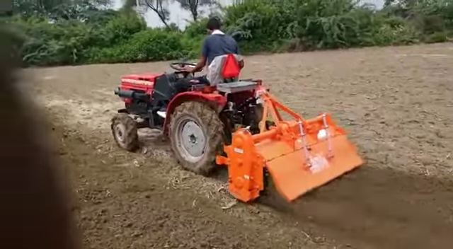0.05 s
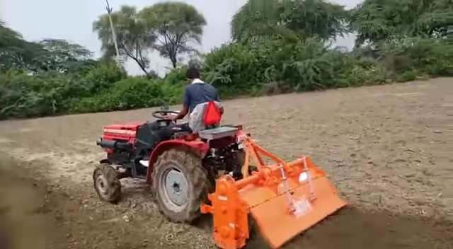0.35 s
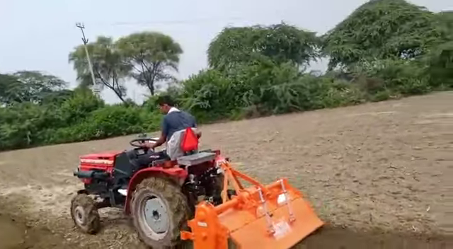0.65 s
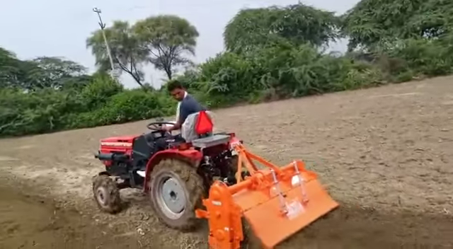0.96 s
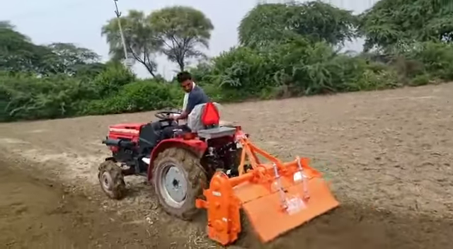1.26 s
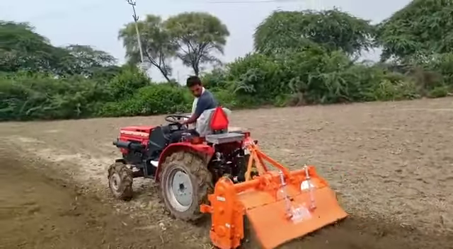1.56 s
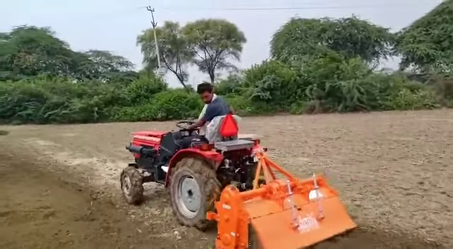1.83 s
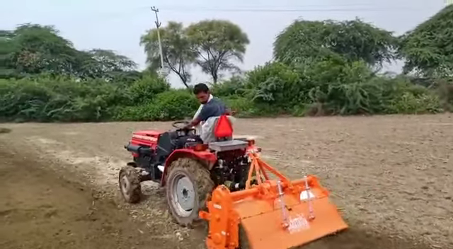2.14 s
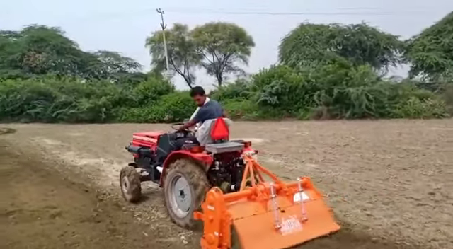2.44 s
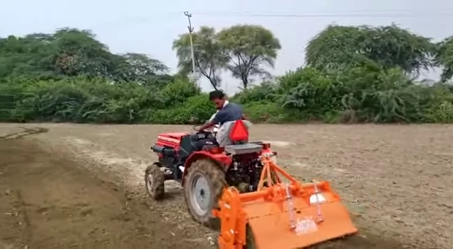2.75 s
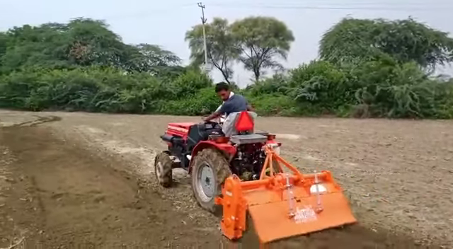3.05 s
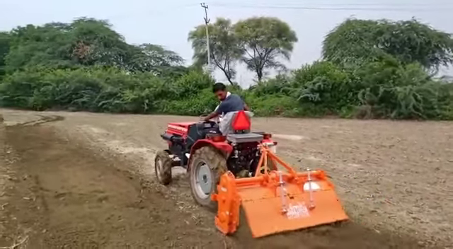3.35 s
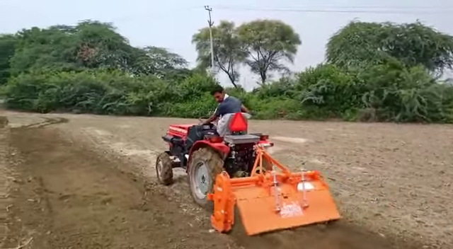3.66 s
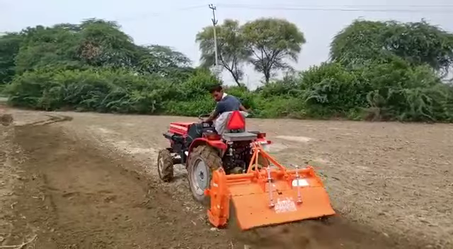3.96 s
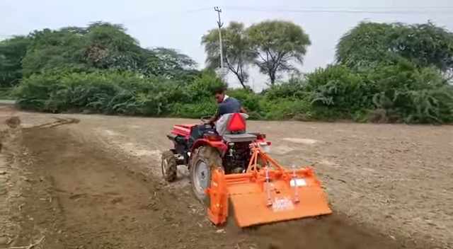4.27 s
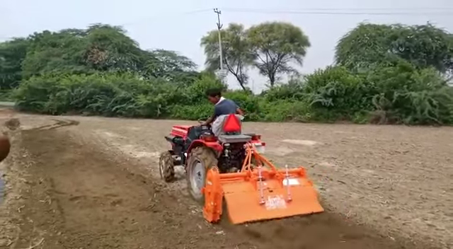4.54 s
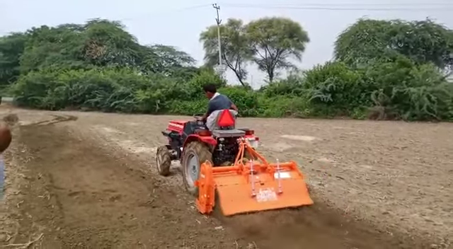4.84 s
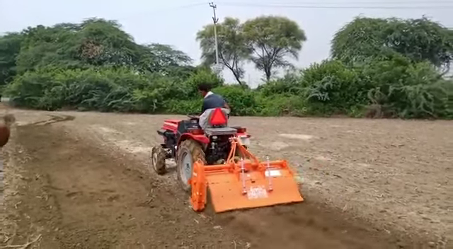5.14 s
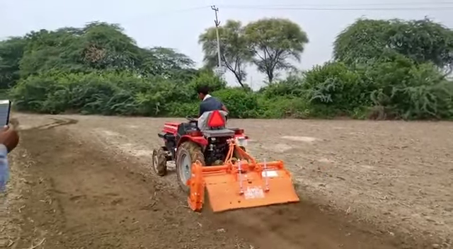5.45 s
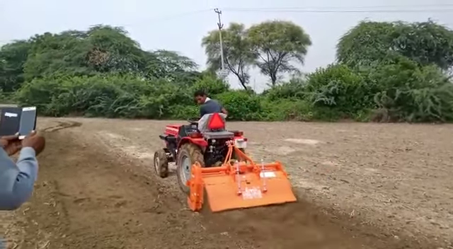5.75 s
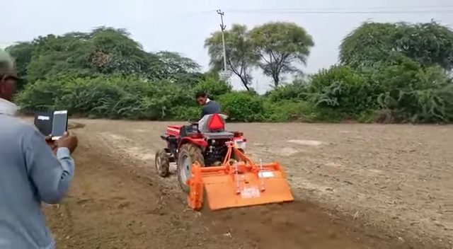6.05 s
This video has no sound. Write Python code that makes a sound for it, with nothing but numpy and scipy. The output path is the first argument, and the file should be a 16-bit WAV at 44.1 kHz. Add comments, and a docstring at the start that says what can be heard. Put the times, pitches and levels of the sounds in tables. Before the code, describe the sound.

A small diesel tractor runs under load throughout, in an open field with no echo: an even exhaust drone, rapid metallic clatter and a faint gear whine. It is brightest at the start, with an airy fan hiss that fades within the first second or so. The rotary tiller behind it churns soil in a dense stream of dull thuds and fine grit. Its blades ring with a rough, pulsing mid-pitched tone, strongest from about 2 to 3.5 seconds and much weaker after 4. Clods and stones hit the steel hood in short irregular knocks, the sharpest around 2.6 to 2.7 seconds, with others near 1.5, 3.9, 4 and 4.5 seconds. The engine's rasp softens slightly as the tractor moves slowly away, and its pitch sags a little after 5 seconds. The microphone is nearby, with dull treble.

```python
"""An open field: a small three-cylinder diesel tractor drags a rotary tiller past and slowly away.
The exhaust drones, the engine block clatters at each firing, the gears whine and the fan hisses.
The tiller's spinning blades churn the soil, ring in surges as they bite,
and throw clods and stones against its steel hood."""
import sys
import numpy as np
from scipy import signal
from scipy.fft import rfft, irfft, next_fast_len
from scipy.io import wavfile
from scipy.ndimage import uniform_filter1d, minimum_filter1d, map_coordinates

SR = 44100
rng = np.random.default_rng(int(sys.argv[2]) if len(sys.argv) > 2 else 0)


def put_to_file(sound):
    """Save the sound as 16-bit audio at rate SR, in the file named by the first command-line argument."""
    columns = np.atleast_2d(sound).T  # one column per channel
    safe = np.clip(columns, -1, 1)
    whole_steps = np.round(safe * 32767)
    wavfile.write(sys.argv[1], SR, whole_steps.astype(np.int16))


N = 269010
CYLINDERS = 3

# Clatter level, higher where the tiller digs deeper; soil and grit follow it: t/s, level/dB
WORKLOAD = [(0, -14), (.5, -15), (1.55, -15.5), (2.4, -18), (2.55, -17), (2.8, -18.5), (3.02, -18.5),
            (3.22, -16), (4.15, -17.5), (4.68, -18.5), (4.82, -15.5), (5.3, -17), (6.1, -17.5)]


def seconds():
    """The time of each sample."""
    return np.arange(N) / SR


def amp(db):
    """Turn decibels into a gain."""
    return 10 ** (np.asarray(db) / 20)


def unit(x):
    """Scale x to an average (rms) level of 1."""
    return x / np.sqrt(np.mean(x ** 2) + 1e-20)


def curves(rows):
    """Join a table's points in time: one curve for each column after the first."""
    times, *columns = np.transpose(rows)
    return [np.interp(seconds(), times, column) for column in columns]


def wobble(rate):
    """A smooth curve through `rate` random points a second."""
    points = rng.standard_normal(int(N * rate / SR) + 4)
    return map_coordinates(points, [np.arange(N) * rate / SR])


def filtered(x, response):
    """Scale each frequency in x by response(hz)."""
    size = next_fast_len(len(x) + 8192)
    return irfft(rfft(x, size) * response(np.fft.rfftfreq(size, 1 / SR)), size)[:len(x)]


def coloured(x, spectrum):
    """Shape the tone of x with a table of f/Hz, level/dB."""
    f, db = np.transpose(spectrum)
    return filtered(x, lambda hz: amp(np.interp(np.log(hz + 1), np.log(f), db)))


def patchy(x, depth_db):
    """Let each frequency band of x drift louder and softer on its own."""
    bands = signal.stft(x, nperseg=512)[2]
    drift = uniform_filter1d(rng.standard_normal(bands.shape), size=5, axis=0)
    drift = uniform_filter1d(drift, size=6, axis=1)
    return signal.istft(bands * amp(depth_db * unit(drift)), nperseg=512)[1][:N]


def grains(per_s, spread_db, t60):
    """Many tiny hits at random moments, each a noise burst that dies by 60 dB in t60 seconds."""
    when, chance = rng.random((int(per_s * N / SR), 2)).T
    sizes = amp(-spread_db * np.log(0.017 + chance))
    energy = np.bincount((when * N).astype(int), sizes ** 2, N)
    energy = signal.lfilter([1], [1, -amp(-120 / (t60 * SR))], energy)
    return unit(np.sqrt(energy) * rng.standard_normal(N))


def tone(firings, multiple, shimmer_db, drift):
    """A tone at a multiple of the firing rate; its level shimmers and its phase drifts (radians)."""
    level = np.sqrt(2) * amp(shimmer_db * wobble(17))
    return level * np.sin(2 * np.pi * (multiple * firings + rng.random()) + drift * wobble(9))


def knocks(firings, decay, scatter_db, cylinder_db):
    """A level that jumps at each firing and dies away; every third jump differs by cylinder_db."""
    index = firings.astype(int)
    size_db = scatter_db * rng.standard_normal(index[-1] + 1)[index]
    size_db += cylinder_db * (index % CYLINDERS == 0)
    return unit(amp(size_db) * np.exp(-decay * (firings % 1)))


def rattle(firings, points=2048):
    """Noise that comes back alike in every engine cycle."""
    place = firings / CYLINDERS % 1 * points
    return unit(np.interp(place, np.arange(points), rng.standard_normal(points), period=points))


def panel_echo(x, delay_s, share):
    """Sound bounces once between steel panels, lifting some pitches and weakening others."""
    return filtered(x, lambda hz: 1 + share * np.exp(-2j * np.pi * hz * delay_s))


def ground_bounce(x, centre_hz=810, width_hz=73, loss_per_s=0.058):
    """As the tractor moves off, the bounce off the field cancels more and more of one band."""
    band = filtered(x, lambda hz: np.exp(-.5 * ((hz - centre_hz) / width_hz) ** 2))
    return x - np.clip(loss_per_s * seconds(), 0, 1) * band


def fan(start_db=-18.5, fade_db_per_s=12):
    """Cooling air hisses out of the engine's open side, which soon turns away."""
    # Tone of the rushing air: f/Hz, level/dB
    air_spectrum = [(2900, -15), (3130, 0), (3330, -16), (3550, 10), (4300, 5), (5200, -4), (5750, 7),
                    (7000, -11), (8300, 9), (9300, 5), (10500, -18), (15000, -14)]
    air = coloured(patchy(rng.standard_normal(N), depth_db=3), air_spectrum)
    return amp(start_db - fade_db_per_s * seconds()) * unit(air)


def gears(firings, fade_db_per_s=.6):
    """Gear teeth whine in step with the engine, wavering with the load and fading with distance."""
    # Gear tones: multiple of the firing rate, relative level/dB
    whines = [(2.35, -49), (5.88, -40.5), (6.92, -49.5), (11.75, -41), (13.85, -35)]
    whine = sum(amp(db + 2.8 * wobble(1.94)) * tone(firings, multiple, shimmer_db=0, drift=0.32)
                for multiple, db in whines)
    return amp(2.5 - fade_db_per_s * seconds()) * whine


def soil():
    """The blades churn the earth: a dense stream of dull thuds."""
    # Tone of the thuds: f/Hz, level/dB
    thud_spectrum = [(20, -46), (33, -33), (48, -20), (80, -8.5), (150, -3), (220, -0.5), (275, -4.5),
                     (370, -1), (430, -0.5), (520, 1), (660, 1), (800, -1), (1100, -6), (2500, -3),
                     (6000, -22.5)]
    work_db, = curves(WORKLOAD)
    thuds = coloured(grains(per_s=600, spread_db=0, t60=0.031), thud_spectrum)
    return amp(work_db - 4) * unit(thuds)


def tiller_ring(firings, firings_per_turn=22, pitch_multiple=15.05, swell_turns=.027, rest_db=-36.5):
    """The steel rotor sings roughly at one pitch, swelling as the same blades bite in every turn."""
    # Strength of the swells: t/s, level/dB
    ring_levels = [(0, -19), (1.1, -20), (1.6, -23), (2.2, -18), (3.2, -16.5), (4.4, -26), (6.1, -28)]
    # Blades that bite hard: place in the turn (0-1), relative level/dB
    blades = [(.02, -3), (.235, -0.5), (.48, -1.5), (.61, -7.5), (.69, -1.5), (.89, -6)]
    ring_db, = curves(ring_levels)
    turns = firings / firings_per_turn
    bites = np.zeros(N)
    for place, db in blades:
        turns_from_bite = (turns - place + .5) % 1 - .5
        bites += amp(db) * np.exp(-.5 * (turns_from_bite / swell_turns) ** 2)
    phase = 2 * np.pi * pitch_multiple * firings + 0.73 * wobble(55)
    rasp = 1 + 0.41 * wobble(170)
    earth_db = wobble(12)  # no two bites meet the same earth
    return (amp(rest_db) + amp(ring_db + earth_db) * bites) * rasp * np.sin(phase)


def small_clods(per_s=4, db=-11, centre_hz=2000, octaves=0.43):
    """Weak clods fly at random moments: extra rows for the table in stones()."""
    draws = rng.random((int(per_s * N / SR), 3))
    return [(when * N / SR, db + (size - .5), centre_hz * 2 ** (hardness - .5), octaves)
            for when, size, hardness in draws]


def stones(crack_db=-3, crack_t60=0.027):
    """Clods and stones ring the earth-damped hood; a harder hit wakes its higher tones."""
    # The loudest hits: t/s, relative level/dB, centre f/Hz, spread/octaves
    big_hits = [(.47, -3, 3380, .3), (.936, -8, 6000, .6), (1.223, -1.5, 1500, 1), (1.479, 0, 1690, .35),
                (1.559, -0.5, 1900, .58), (1.699, -9, 6500, .6), (2.001, -5, 2600, 0.43),
                (2.539, -3.5, 1700, 0.97), (2.5707, 2, 3200, 0.75), (2.682, 7, 3570, 0.56),
                (3.036, -6, 1540, .24), (3.368, -2, 4160, 0.75), (3.726, -3.5, 1990, .5),
                (3.892, 1, 1660, .35), (3.919, -4, 3700, .45), (3.939, -4, 2400, .6),
                (4.0203, 2.5, 584, 0.55), (4.243, -2.5, 2200, 1), (4.342, -4, 1400, .4),
                (4.5125, 1.5, 1650, 0.44), (4.995, -3, 2000, .5), (5.143, -2, 2000, 0.78),
                (5.559, -5, 1410, .36), (6.078, -1, 2480, 0.47)]
    # The hood's own tones: f/Hz, relative level/dB, time to die by 60 dB/s
    hood_tones = [(430, 3, 0.024), (610, 1, 0.02), (745, 4, 0.015), (1120, 8, .022), (1341, 4.5, 0.049),
                  (1710, 1.5, 0.023), (2052, 0, 0.051), (2320, 3.5, 0.038), (2880, 1.5, 0.01),
                  (3294, 4.5, 0.02), (3810, -3.5, 0.018), (4800, 0, .015), (6850, 15.5, 0.012)]
    out = np.zeros(N + SR)
    t = np.arange(SR // 8) / SR
    for start_s, db, centre_hz, octaves in big_hits + small_clods():
        contact = lambda hz: (1 + (np.log2((hz + 1) / centre_hz) / octaves) ** 2) ** -1.2
        ring = np.zeros(len(t))
        for hz, tone_db, t60 in hood_tones:
            level = contact(hz) * amp(tone_db + rng.normal() - 60 * t / t60)
            ring += level * np.sin(2 * np.pi * (hz * rng.normal(1, 0.011) * t + rng.random()))
        # the crack of the hit covers more frequencies than the ring
        noise = rng.standard_normal(len(t))
        crack = filtered(noise, lambda hz: contact(hz) ** 0.56 / (1 + (hz / 9000) ** 4))
        crack *= amp(-60 * t / crack_t60)
        attack = 1 - np.exp(-t / 0.00079)
        hit = (unit(ring) + amp(crack_db) * unit(crack)) * attack
        onset_level = np.std(hit[:SR // 200])  # the first 5 ms
        out[round(start_s * SR):][:len(t)] += amp(db - 10) * hit / onset_level
    return out[:N]


def exhaust(firings):
    """Firing pulses leave the silencer as a stack of clean tones."""
    # Levels as the tractor turns away: t/s, boom/dB, drone/dB, hum/dB, bark/dB
    exhaust_levels = [(0, -26.5, -22.5, -28.5, -15.5), (1.1, -28, -23, -30, -19), (2, -28, -26, -28, -21.5),
                      (2.8, -30.5, -29, -31.5, -24), (3.2, -26, -26, -27.5, -23.5),
                      (4.4, -27, -31, -31.5, -21.5), (5, -24.5, -25.5, -29, -26),
                      (5.4, -25.5, -29, -26.5, -21.5), (6.1, -24.5, -27.5, -27.5, -23)]
    # Low tones: multiple of the firing rate, level/dB
    low_tones = [(1, -38.5), (4 / 3, -50), (5 / 3, -46.5), (7 / 3, -40.5), (8 / 3, -50), (10 / 3, -42.5),
                 (11 / 3, -47.5), (4, -39), (13 / 3, -46)]
    # High tones that make the bark: multiple of the firing rate, level/dB relative to the bark
    bark_tones = [(6, -14), (7, -15), (23 / 3, -15.5), (8, -12.5), (25 / 3, -18), (9, -18.5),
                  (28 / 3, -19.5), (11, -16.5), (17, -22), (18, -16.5)]

    def stack(rows):
        """Unequal cylinders put tones on thirds of the firing rate too."""
        return sum(amp(db) * tone(firings, multiple, shimmer_db=0.34, drift=0.07)
                   for multiple, db in rows)

    boom_db, drone_db, hum_db, bark_db = curves(exhaust_levels)
    boom = amp(boom_db) * tone(firings, multiple=2, shimmer_db=.8, drift=.04)
    drone = amp(drone_db) * tone(firings, multiple=3, shimmer_db=1.5, drift=0.061)
    low = stack(low_tones)
    hum = amp(hum_db) * tone(firings, multiple=5, shimmer_db=.5, drift=.064)
    bark = amp(bark_db) * stack(bark_tones)
    return boom + drone + hum + low + bark


def clatter(firings):
    """Burning fuel knocks, valves tick and crumbs hit the hood, shaking the steel; grit hisses on top."""
    # Tone of the engine's steel: f/Hz, level/dB
    steel_spectrum = [(500, -37), (810, -12), (900, 1.5), (1130, 0), (1270, 1), (1600, 2), (1830, 2),
                      (2100, 1.5), (2300, 2), (2480, -4.5), (2700, -3.5), (2900, -6), (4500, -6),
                      (6500, -19.5)]
    # Tone of the fine grit: f/Hz, level/dB
    grit_spectrum = [(2000, -35.5), (4000, -4), (7000, 3), (10000, 0.5), (15500, -1.5)]
    work_db, = curves(WORKLOAD)
    burn = 0.39 * rattle(firings) + 0.71 * rng.standard_normal(N)
    fuel_knock = knocks(firings, decay=1.6, scatter_db=0.9, cylinder_db=0) * burn
    valves = knocks(2 * firings + 0.11, decay=1, scatter_db=0.5, cylinder_db=-3.5) * rattle(firings)
    crumbs = grains(per_s=1000, spread_db=1.5, t60=0.031)
    blows = patchy(amp(-3) * fuel_knock + amp(-6.5) * valves + crumbs, depth_db=1)
    steel = coloured(panel_echo(blows, delay_s=0.00191, share=0.17), steel_spectrum)

    puffs = knocks(firings, decay=1.5, scatter_db=3.5, cylinder_db=3) * rng.standard_normal(N)
    spray = amp(-6) * puffs + grains(per_s=1200, spread_db=3, t60=0.022)
    grit = coloured(patchy(spray, depth_db=1.5), grit_spectrum)
    grit_db = work_db - 7.5 + 0.31 * seconds()  # the spray behind the hood comes into view
    return amp(work_db) * unit(steel) + amp(grit_db) * unit(grit)


def scene():
    """Tractor and tiller together; one engine sets the pace of every turning part."""
    # Engine speed: t/s, firing rate/Hz
    engine_speed = [(0.0, 65.5), (0.72, 64.1), (1.09, 64.5), (1.6, 64.5), (2.09, 63.5), (2.54, 64.6),
                    (2.91, 64.0), (3.45, 64.0), (3.68, 64.9), (3.88, 64.9), (5.18, 63.6), (5.37, 62.3),
                    (6.04, 62.2)]
    firing_hz, = curves(engine_speed)
    firings = np.cumsum(firing_hz) / SR  # counts up by one at each firing
    engine = exhaust(firings) + gears(firings) + clatter(firings) + fan()
    tiller = soil() + tiller_ring(firings) + stones()
    return ground_bounce(engine + tiller)[None]


def record(dry, ceiling=.9, top_hz=15500):
    """A small microphone with dull, uneven treble; a fast limiter holds down the loudest knocks."""
    # The microphone's response: f/Hz, level/dB
    microphone = [(2700, -2), (3300, -4.5), (3800, -9.5), (4400, -17.5), (5100, -24), (5750, -37),
                  (6300, -26.5), (7100, -23), (7800, -26.5), (10400, -26), (11900, -30), (13400, -24),
                  (14500, -31), (15500, -30)]
    heard = coloured(dry[0], microphone)
    needed_gain = np.minimum(1, ceiling / (np.abs(heard) + 1e-9))
    smooth_gain = uniform_filter1d(minimum_filter1d(needed_gain, size=161), size=161)
    return filtered(heard * smooth_gain, lambda hz: hz < top_hz)[None]


dry = scene()
out = record(dry)
put_to_file(out)
```